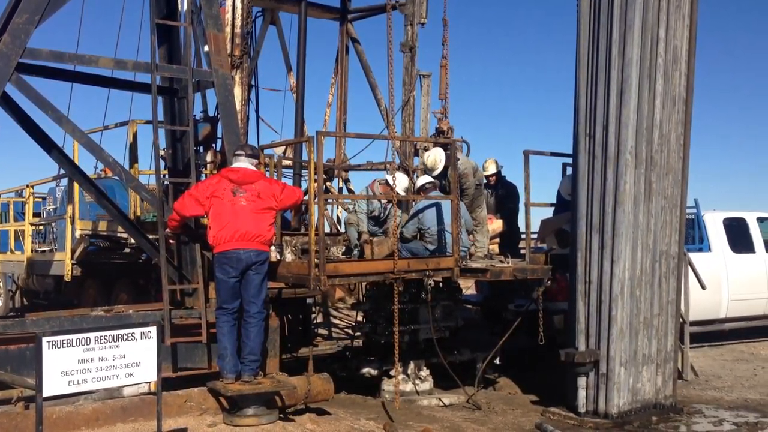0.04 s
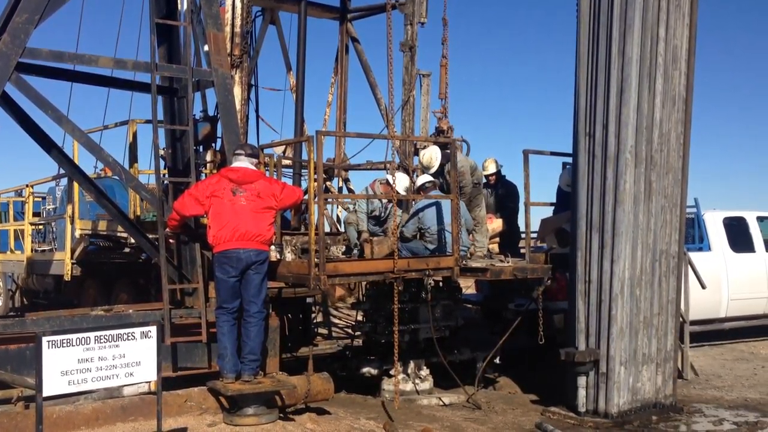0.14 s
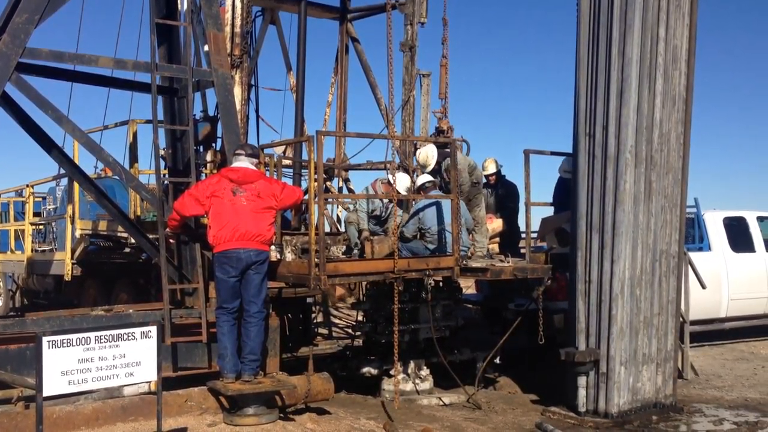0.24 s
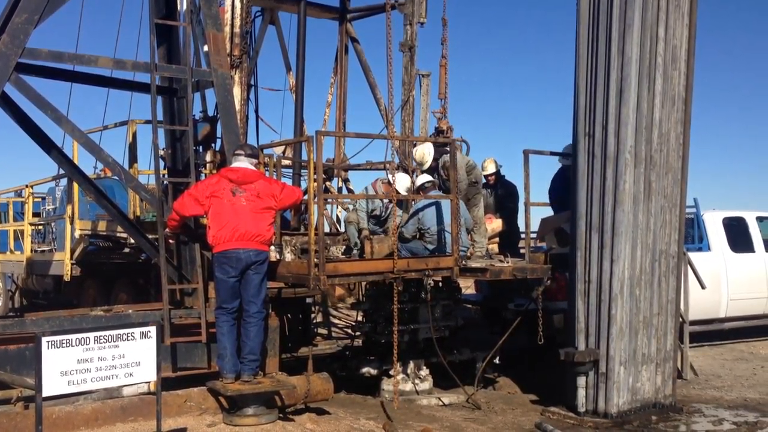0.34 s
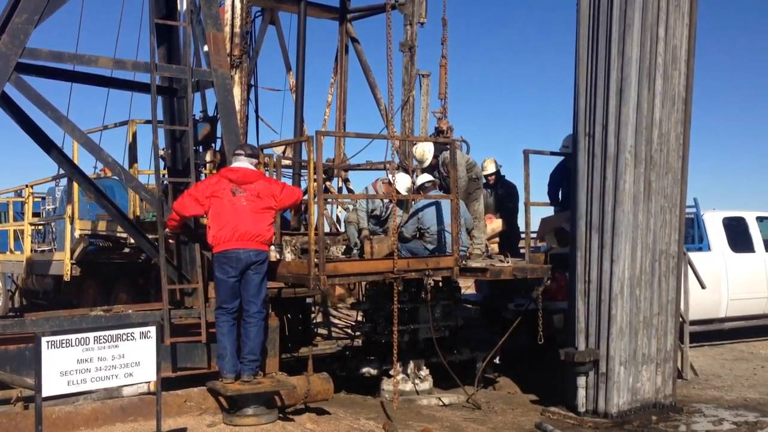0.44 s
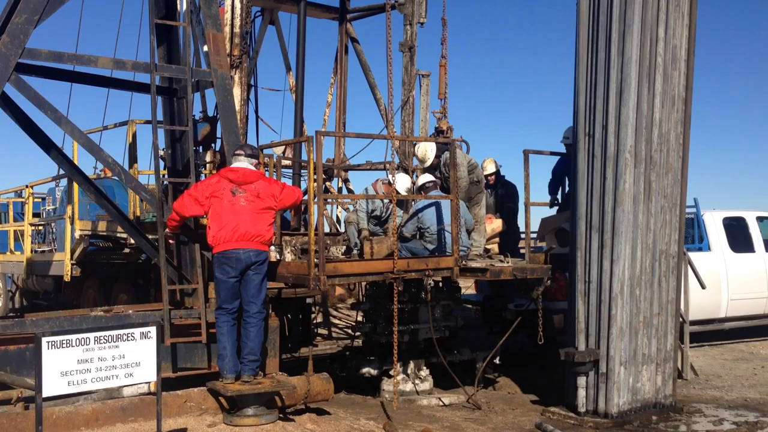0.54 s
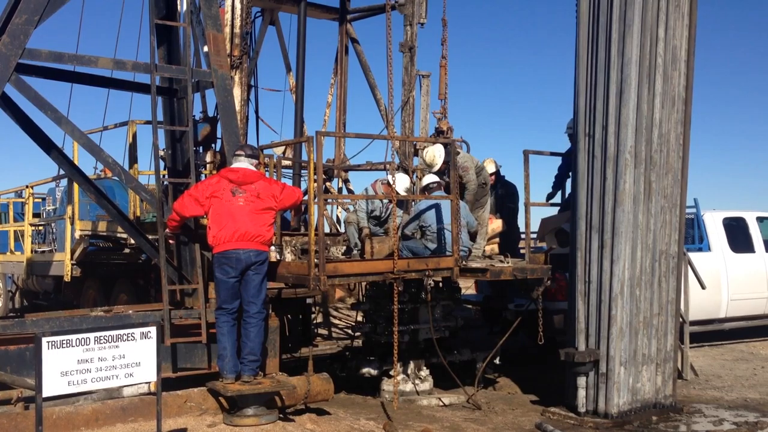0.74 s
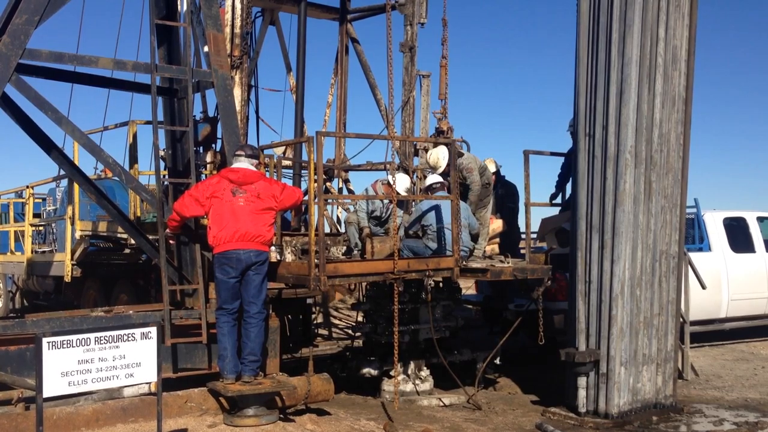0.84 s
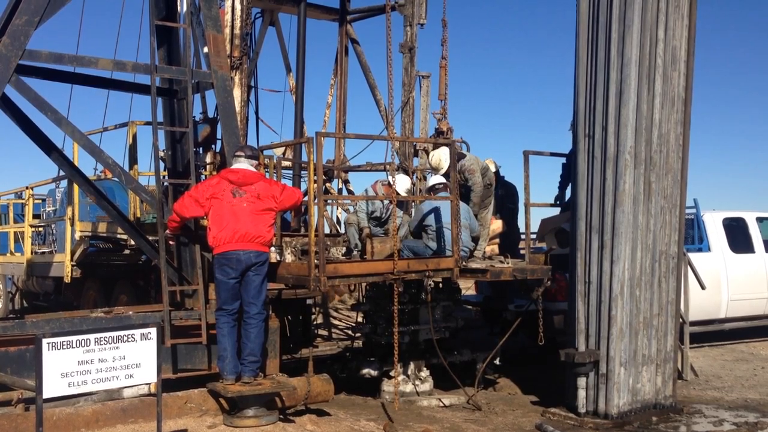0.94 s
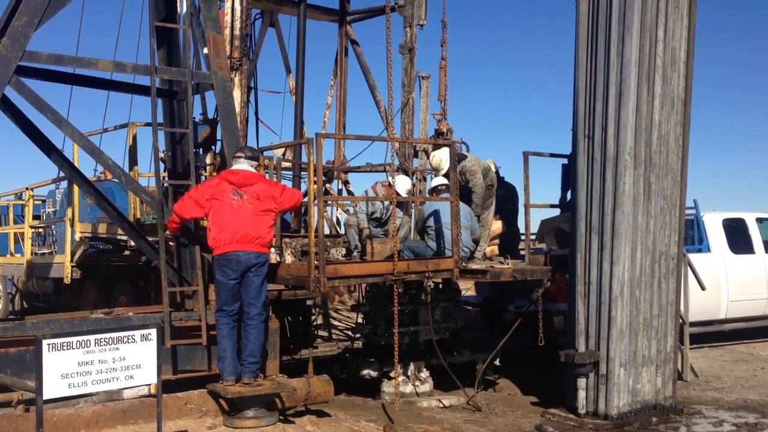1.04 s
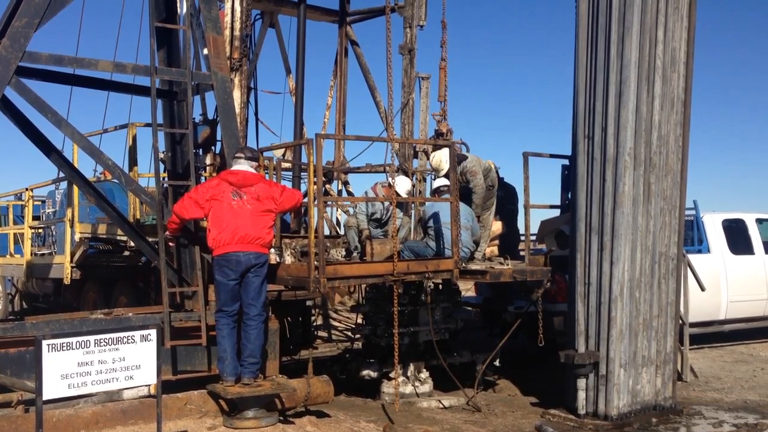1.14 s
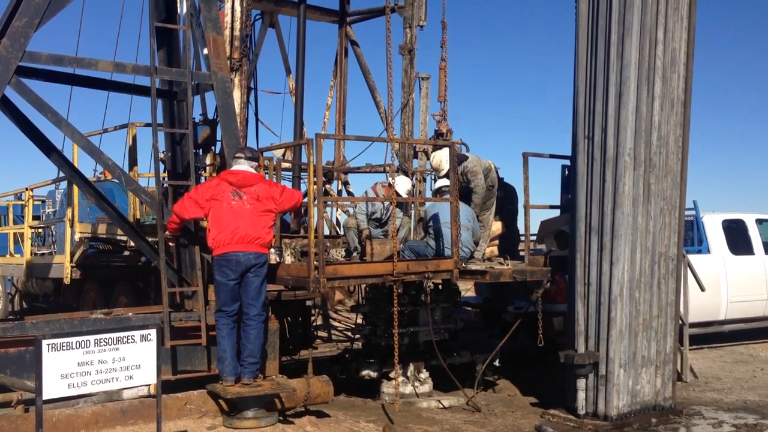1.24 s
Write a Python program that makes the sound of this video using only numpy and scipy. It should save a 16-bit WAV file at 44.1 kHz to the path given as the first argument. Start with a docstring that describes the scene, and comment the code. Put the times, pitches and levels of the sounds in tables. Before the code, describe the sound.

Steady drone and whine of an idling drilling rig, with wind thumping the microphone briefly.

```python
"""A drilling rig idles outdoors: from the start, a diesel drones at about 30 turns a second
under the steady wash and whine of fans and gears. A quarter of a second in, a gust buffets
the microphone in two low, fluttering thumps, while steel tools tick and clink faintly on
the rig floor. Weaker puffs of wind and a few more clinks follow as the rig runs on."""
import sys
import numpy as np
from scipy import signal
from scipy.io import wavfile
from scipy.ndimage import uniform_filter1d

SR = 44100
rng = np.random.default_rng(int(sys.argv[2]) if len(sys.argv) > 2 else 0)


def file_out(sig):
    """Save sig as 16-bit WAV at sys.argv[1]."""
    # one column per channel
    cols = np.atleast_2d(sig).T
    # limit, then scale
    lim = np.clip(cols, -1, 1)
    pcm = np.round(lim * 32767).astype(np.int16)
    wavfile.write(sys.argv[1], SR, pcm)


N = 57330

# The diesel's tones: cycles per engine turn, level/dB
ENGINE_TONES = [(1, -51), (2, -46), (3, -57), (4, -74), (5, -99), (6, -65.5), (7, -77), (9, -70)]
# Tone colour of the machinery noise: f/Hz, relative level/dB per Hz
WASH_SPECTRUM = [(20, 9.5), (60, 5), (130, -5), (250, -8.5), (330, -9), (420, -13.5), (650, -12), (800, -7),
                 (1000, -14), (1130, -1.5), (1350, -10.5), (1750, -12.5), (2300, -11.5), (2850, -21),
                 (3700, -19), (4500, -26), (5900, -25.5), (8500, -28.5), (10000, -29), (12500, -21.5),
                 (15000, -41.5)]
# Boost of that noise's high hiss: t/s, level/dB
HISS_BOOST = [(0, 3.5), (.045, 12.5), (.1, 5), (.25, 0.5), (.29, 9.5), (.33, 7), (.42, 4.5), (.5, 1),
              (.78, 0), (.95, 0), (1.3, 2)]
# Gear and fan whines: f/Hz, width/Hz, level/dB
WHINE_TONES = [(556, 90, -66), (826, 15, -71), (964, 95, -60.5), (1378, 64, -70.5), (1561, 69, -70),
               (1828, 100, -68.5), (1990, 20, -74), (2346, 98, -74), (2446, 120, -69.5), (3050, 19, -80.5),
               (3687, 320, -72.5), (5760, 300, -78), (6310, 140, -81.5)]
# Wind pressure at the microphone: t/s, level/dB
GUST_LEVELS = [(0, -44.5), (.11, -44), (.15, -43), (.19, -43), (.21, -41.5), (.234, -33), (.241, -17.5),
               (.256, -20.5), (.262, -22.5), (.272, -16.5), (.289, -21), (.318, -17.5), (.338, -30.5),
               (.347, -26.5), (.36, -32), (.379, -23.5), (.41, -54), (.428, -27.5), (.436, -26),
               (.458, -33.5), (.476, -29.5), (.51, -34.5), (.548, -34), (.567, -50), (.7, -43.5),
               (.74, -40), (.78, -48), (1.1, -52.5), (1.15, -38.5), (1.185, -46), (1.225, -35),
               (1.26, -42.5), (1.3, -45.5)]
# Tone colour of the wind at full strength: f/Hz, relative level/dB per Hz
WIND_SPECTRUM = [(20, 0.5), (50, -0.5), (80, -1), (110, 6), (160, -6.5), (260, -3.5), (350, -12.5),
                 (500, -11), (800, -19), (1200, -33), (2000, -33.5), (3000, -54), (5000, -62)]
# Small swirls of air that slap the microphone: t/s, peak level/dB, centre f/Hz
SWIRLS = [(0.149, -32.5, 53), (.177, -28.5, 41.5), (0.2424, -15, 84), (0.245, -18, 220), (0.2491, -16, 282),
          (.255, -12, 342), (.2695, -15, 310), (.273, -14.5, 440), (0.2754, -15, 307), (.282, -22, 447),
          (.306, -18, 380), (0.315, -21, 485), (0.3188, -14, 232), (0.332, -20.5, 246), (0.345, -23.5, 133),
          (.375, -28.5, 254), (0.434, -20.5, 286), (0.441, -23.5, 69.4), (0.4462, -25, 168),
          (0.488, -32, 151), (.5135, -26.5, 151), (0.545, -25, 156), (1.146, -38.5, 210),
          (1.208, -33.5, 165), (1.224, -32, 87)]
# Ringing steel: t/s, f/Hz, level/dB, time to fade by 60 dB/s
STEEL_CLINKS = [(0.33, 4124, -53.5, 0.18), (.329, 3174, -50.5, 0.067), (.329, 4360, -58.5, 0.22),
                (0.892, 11700, -61, 0.2), (.893, 10500, -69.5, .18), (1.012, 1000, -52, 0.084),
                (1.05, 1864, -53, 0.14), (1.255, 3480, -58, 0.17)]
# Small dry ticks: t/s, level/dB, time to fade by 60 dB/s
STEEL_TICKS = [(.284, -47.5, 0.092), (.441, -55, 0.045), (1.054, -46, .025)]

t = np.arange(N) / SR


def from_db(db):
    """Turn decibels into a gain."""
    return 10 ** (np.asarray(db) / 20)


def rms_one(x):
    """Scale a signal to an average strength (rms) of 1."""
    return x / np.sqrt(np.mean(x ** 2) + 1e-20)


def in_time(rows):
    """Join (time, value) points with straight lines."""
    return np.interp(t, *np.transpose(rows))


def drift(hz):
    """A smooth random wobble of strength 1; more hz makes it quicker."""
    r = np.exp(-2 * np.pi * hz / SR)
    return rms_one(signal.lfilter([1], [1, -2 * r, r * r], rng.standard_normal(2 * N))[N:])


def noise_bands(spectrum):
    """Yield (centre f/Hz, noise) for bands a third of an octave wide, together of strength 1."""
    edges = 18 * 2 ** (np.arange(31) / 3)
    centres = np.sqrt(edges[1:] * edges[:-1])
    f, db = np.transpose(spectrum)
    gains = from_db(np.interp(np.log(centres), np.log(f), db)) * np.sqrt(np.diff(edges))
    for low, high, hz, gain in zip(edges, edges[1:], centres, gains / np.linalg.norm(gains)):
        sos = signal.butter(3, [low, high], "band", fs=SR, output="sos")
        yield hz, gain * rms_one(signal.sosfilt(sos, rng.standard_normal(N + SR // 2))[-N:])


def dying(start, fade_s):
    """Jump to 1 at the start, then fall by 60 dB every fade_s seconds."""
    age = t - start
    return (age >= 0) * np.exp(-np.log(1000) * np.maximum(age, 0) / fade_s)


def diesel(angle, flutter_db=1.0):
    """The turning engine drones at multiples of its speed, each tone fluttering a little."""
    drone = 0
    for multiple, db in ENGINE_TONES:
        peak = np.sqrt(2) * from_db(db + flutter_db * drift(hz=5.7))
        drone += peak * np.cos(multiple * angle + rng.uniform(-1.6, 1))
    return drone


def machinery(angle, wash_db=-51.5, flicker_db=1.5, hiss_from_hz=5300):
    """Fans and gears make a wash of noise that throbs with the engine, plus rough whines."""
    hiss_db = in_time(HISS_BOOST)
    wash = whines = 0
    for hz, band in noise_bands(WASH_SPECTRUM):
        boost_db = hiss_db / (1 + (hiss_from_hz / hz) ** 2)
        wash += band * from_db(flicker_db * drift(hz=6.3) + boost_db)
    for hz, width, db in WHINE_TONES:
        roughness = drift(width / 2) + 1j * drift(width / 2)  # shakes both loudness and pitch
        whines += from_db(db) * rms_one(np.real(roughness * np.exp(2j * np.pi * hz * t)))
    throb = 1 + 0.13 * np.cos(angle)
    return from_db(wash_db) * wash * throb + whines


def wind(full_gust_db=-12, dull_from_hz=130, lump_db=2.5):
    """Lumpy, churning air pushes on the microphone and sounds brighter as the gust grows."""
    gust_db = in_time(GUST_LEVELS)
    lumps = np.tanh(drift(hz=253))
    db_per_octave = 0.28 * (gust_db - full_gust_db) + lump_db * lumps
    rumble = 0
    for hz, band in noise_bands(WIND_SPECTRUM):
        if hz < 5000:
            octaves_up = np.log2(1 + (hz / dull_from_hz) ** 2) / 2
            rumble += band * from_db(octaves_up * db_per_octave)
    # Even out the rumble over about 20 ms, so that the gust sets its loudness.
    evened = rumble / np.sqrt(uniform_filter1d(rumble ** 2, size=900) + 1e-12)
    return from_db(gust_db) * evened


def swirls(falloff=1.6):
    """Each swirl of air sweeps past as a dip and rise in pressure; small ones sound higher."""
    slaps = 0
    for when, db, hz in SWIRLS:
        passage = 2 * np.pi * hz * (t - when)
        swing = passage / (1 + passage ** 2) ** falloff
        slaps += from_db(db) * swing / swing.max()
    return slaps


def tool_ticks(above_hz=8450):
    """Steel parts tick: short bursts of bright noise."""
    treble_only = signal.butter(2, above_hz, "high", fs=SR, output="sos")
    bright = rms_one(signal.sosfilt(treble_only, rng.standard_normal(N)))
    return bright * sum(from_db(db) * dying(start, fade_s) for start, db, fade_s in STEEL_TICKS)


def tool_clinks(rattle_depth=0.67):
    """Steel tools ring briefly, with a fast rattle in the tone."""
    ringing = 0
    for start, hz, db, fade_s in STEEL_CLINKS:
        ringing += from_db(db) * dying(start, fade_s) * np.sin(2 * np.pi * hz * (t - start))
    return ringing * (1 + rattle_depth * drift(hz=104))


def scene():
    """Add the rig, the wind and the tools into one channel."""
    turns_per_s = 29.8 * (1 + 0.0046 * drift(hz=1.2))  # the idle speed wanders slightly
    angle = 2 * np.pi * np.cumsum(turns_per_s) / SR
    return (diesel(angle) + machinery(angle) + wind() + swirls() + tool_ticks() + tool_clinks())[None]


def record(dry, bass_hz=18.4, top_hz=15200):
    """Soften the deepest rumble and cut off the highest treble steeply."""
    bass_cut = signal.butter(2, bass_hz, "high", fs=SR, output="sos")
    top_cut = signal.ellip(12, .1, 90, top_hz, fs=SR, output="sos")
    return signal.sosfilt(top_cut, signal.sosfilt(bass_cut, dry))


dry = scene()
out = record(dry)
file_out(out)
```